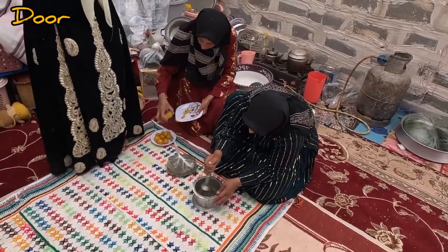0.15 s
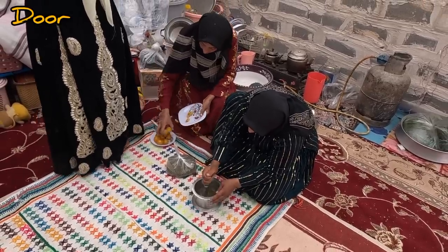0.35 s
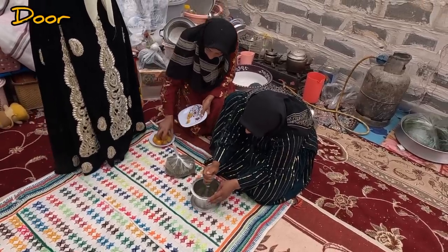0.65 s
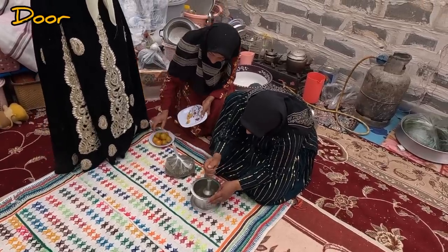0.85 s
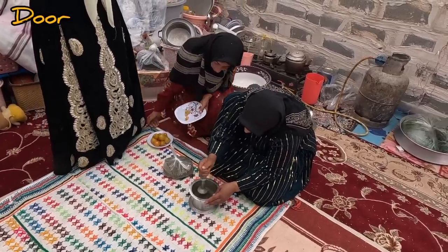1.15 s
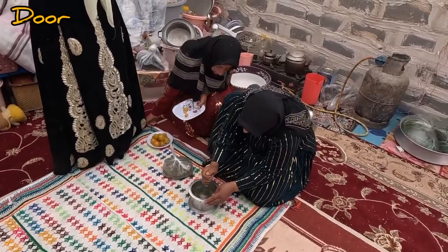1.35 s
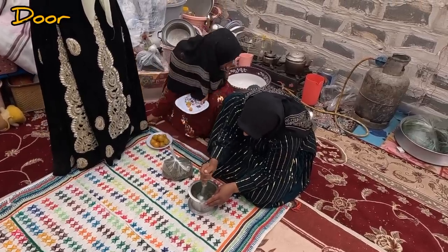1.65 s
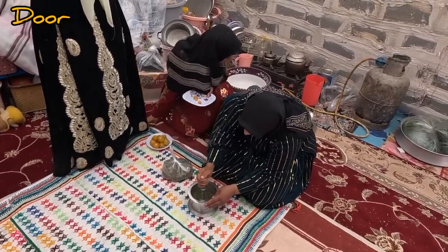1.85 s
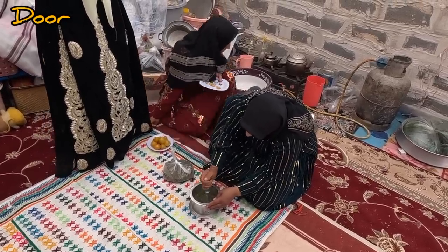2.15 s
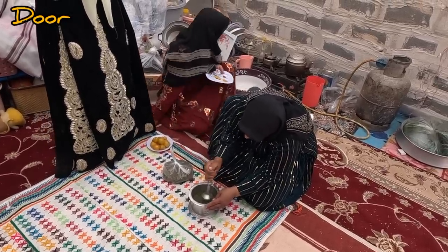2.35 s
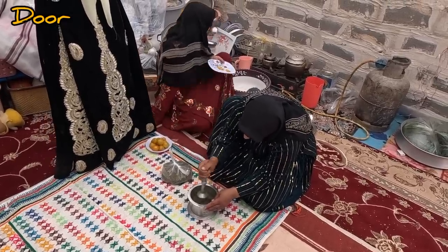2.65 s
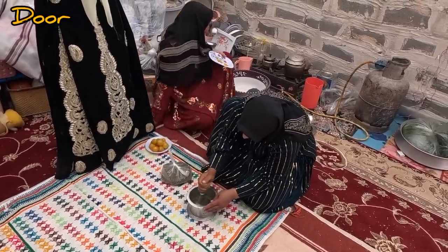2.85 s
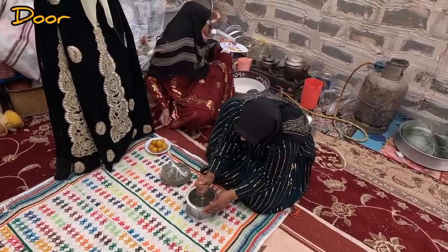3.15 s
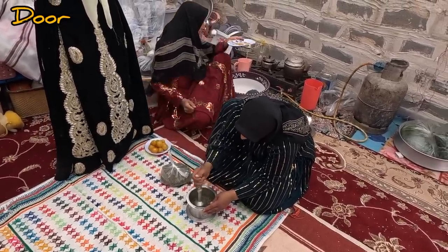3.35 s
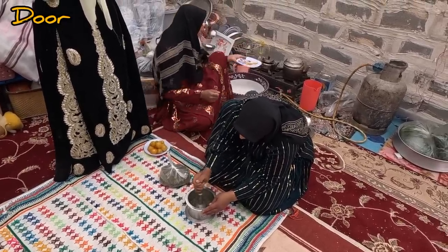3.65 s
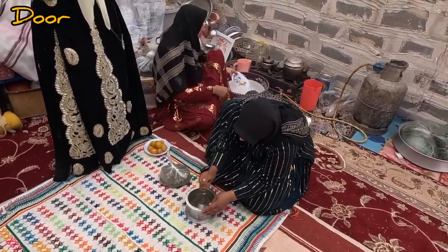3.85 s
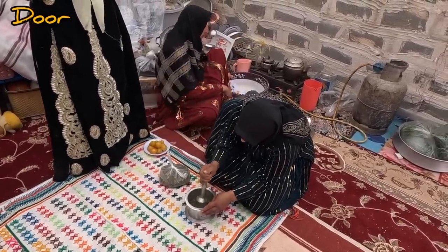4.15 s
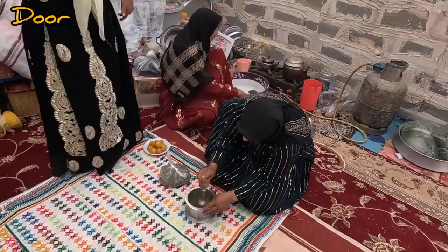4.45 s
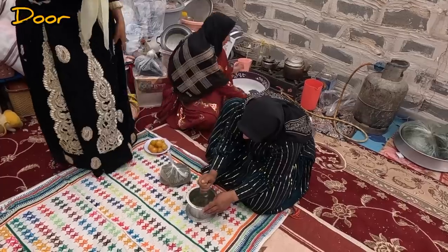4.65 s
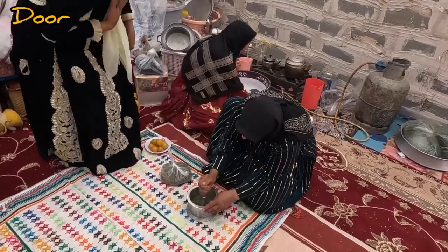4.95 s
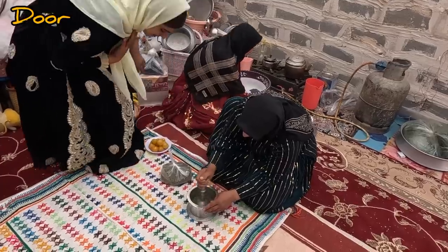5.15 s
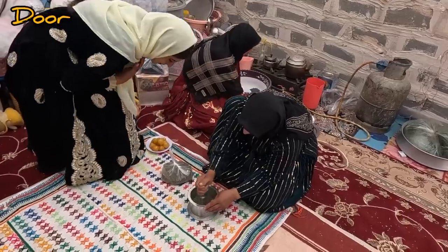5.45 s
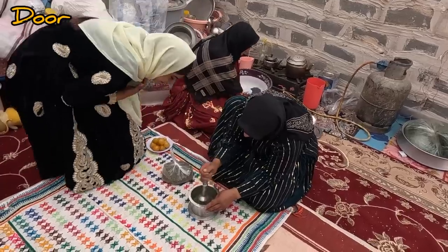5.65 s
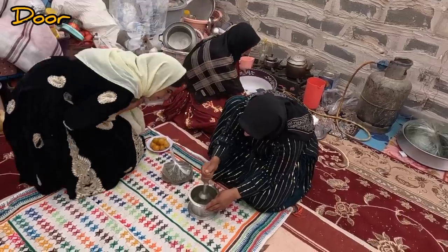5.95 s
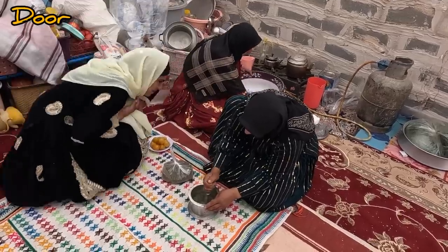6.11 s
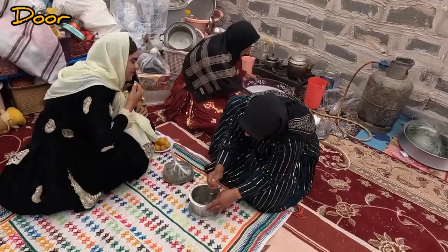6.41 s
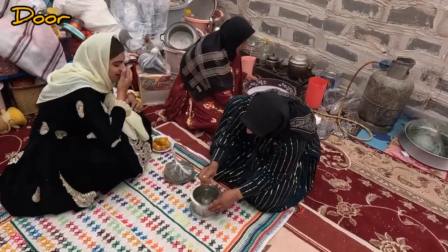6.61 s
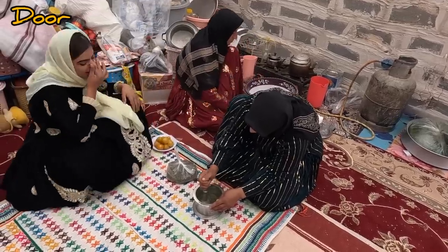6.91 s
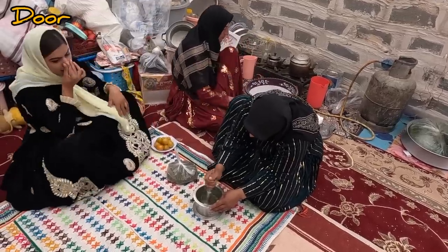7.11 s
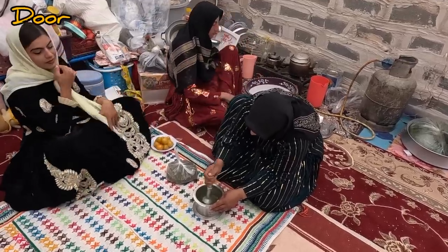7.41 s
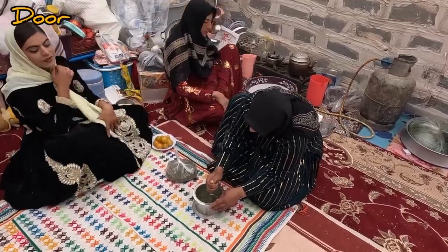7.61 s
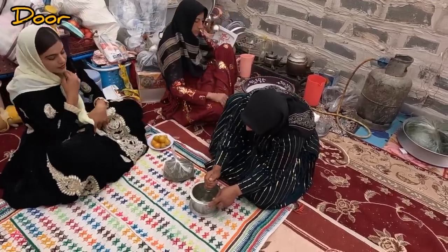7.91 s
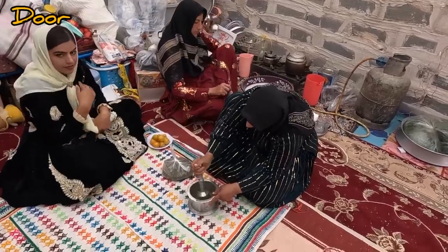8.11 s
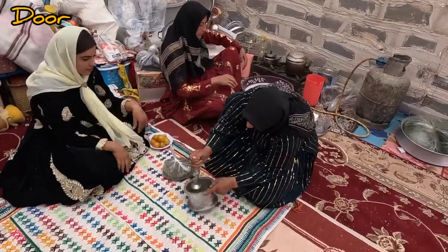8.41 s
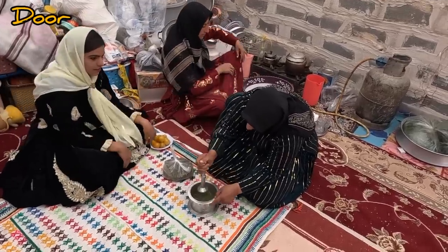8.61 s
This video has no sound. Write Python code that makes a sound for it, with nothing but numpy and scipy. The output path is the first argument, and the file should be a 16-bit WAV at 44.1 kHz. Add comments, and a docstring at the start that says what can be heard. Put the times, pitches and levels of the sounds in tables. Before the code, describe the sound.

Steady dull knocks of a pestle crushing dried herbs in a small metal mortar, with soft rustling, a cup clink and a dish set down.

```python
"""From the start a metal pestle pounds herbs in a metal mortar, held by hand on a carpeted floor: each
blow is a puff of crunching noise, then ringing tones of floor, mortar and pestle. Shaped noise makes
rustling clothes, room tone and rumbling air throughout; puffs of noise make small ticks, clicks and short
swishes. Near 2.8 s a touched cup rings; from 4.2 s a dish is set down, rattles (random contacts) and drags.
After the last blow, near 8 s, a soft bump comes and the pestle sings faintly as it slides on the wall."""
import sys
import numpy as np
from scipy import signal
from scipy.fft import rfft, irfft, next_fast_len
from scipy.io import wavfile
from scipy.ndimage import uniform_filter1d

SR = 44100
rng = np.random.default_rng(int(sys.argv[2]) if len(sys.argv) > 2 else 0)


def dump_mix(stems):
    """Bounce the given channels to the path in sys.argv[1] as a 16-bit WAV at rate SR."""
    frames = np.atleast_2d(stems).T  # one column per channel
    limited = np.clip(frames, -1, 1)  # hard clip at full scale
    pcm = np.round(limited * 32767).astype(np.int16)
    wavfile.write(sys.argv[1], SR, pcm)


N = 386757  # length [samples]


def gain_of(db):
    """Turns dB into a gain."""
    return 10 ** (np.asarray(db) / 20)


def evened(x):
    """Scales a signal to rms 1."""
    return x / np.sqrt(np.mean(x ** 2) + 1e-20)


def read(points, hz):
    """Reads a table between its points, on a log-frequency axis."""
    f, value = np.transpose(points)
    return np.interp(np.log(hz + 1), np.log(f + 1), value)


def add(mix, s, sound):
    """Adds a sound at time s, which may lie just before the start."""
    at = round(s * SR)
    sound = sound[..., max(-at, 0):]
    part = mix[..., max(at, 0):][..., :sound.shape[-1]]
    part += sound[..., :part.shape[-1]]


def panned(db, pan_db):
    """Gives the gains of left and right, pan_db apart."""
    return gain_of(db + np.array([[.5], [-.5]]) * pan_db)


def coloured(x, points):
    """Filters x by a table of levels over frequency, then scales it to rms 1."""
    hz = np.fft.rfftfreq(x.shape[-1], 1 / SR)
    spectrum = rfft(x) * gain_of(read(points, hz))
    return evened(irfft(spectrum, x.shape[-1]))


SHARE_DB = 2.5  # how unevenly a strike shares itself among the tones [dB]


def ring(modes, force, choke_s, rise_s=1e-5):
    """A force sets an object's tones ringing; after choke_s they die quickly. Peak 1."""
    t = np.arange(SR // 4) / SR
    share_db = SHARE_DB * rng.standard_normal(len(modes))
    tone = 0
    for (hz, db, t60), extra_db in zip(modes, share_db):
        tone = tone + gain_of(db + extra_db - 60 * t / t60) * np.sin(2 * np.pi * hz * t)
    rise = 1 - np.exp(-t / rise_s)
    choke = 1 / (1 + (t / choke_s) ** 6)
    out = signal.oaconvolve(tone * rise * choke, force)[:len(t)]
    return out / abs(out).max()


def burst(points, rise_s, t60, grit):
    """A gritty puff of noise rises quickly and dies; more grit [dB] makes its grains less even."""
    t = np.arange(SR // 4) / SR
    grains = rng.standard_normal(len(t)) * gain_of(grit * rng.standard_normal(len(t)))
    rise = 1 - np.exp(-t / rise_s)
    return coloured(grains, points) * rise * gain_of(-60 * t / t60)


def diffuse(layers, size, same, patchy_db, flicker_db):
    """Patchy, flickering noise from (spectrum, times, levels) layers, alike in both ears by `same`."""
    hop = size // 4
    frames, hz = N // hop + 5, np.fft.rfftfreq(size, 1 / SR)
    t = np.arange(frames) * hop / SR
    a, b, c, d, patches = rng.standard_normal((frames, len(hz), 5)).T
    patches = uniform_filter1d(patches, size=6, axis=0)  # smooth over frequency, then time
    patches = evened(uniform_filter1d(patches, size=16, axis=1))
    flicker = evened(uniform_filter1d(rng.standard_normal(frames), size=3))
    power = 0
    for points, s, db in layers:
        shape = gain_of(read(points, hz))
        shape = shape[:, None] / np.linalg.norm(shape)
        power = power + (shape * gain_of(np.interp(t, s, db))) ** 2
    same = np.clip(read(same, hz), -1, 1)[:, None]
    left = a + 1j * b
    right = same * left + np.sqrt(1 - same ** 2) * (c + 1j * d)
    z = np.array([left, right])
    z *= np.sqrt(power) * gain_of(patchy_db * patches + flicker_db * flicker)
    return signal.istft(z, nperseg=size, noverlap=size - hop)[1][:, :N]


def swells(rows, under_db):
    """Bell-shaped swells of level over a steady level under_db; gives times and dB."""
    t = np.arange(0, N / SR, .005)
    power = gain_of(2 * under_db)
    for s, db, length_s in rows:
        power = power + gain_of(2 * db) * np.exp(-((t - s) / length_s) ** 2 * 2)
    return t, 10 * np.log10(power)


# rumble of moving air, before the left-right offset: (time [s], level [dB])
AIR_RUMBLE = [(0.0, -50), (1.0, -49), (1.9, -55), (2.45, -50), (2.9, -57), (3.37, -50), (3.95, -58),
              (4.27, -52), (4.6, -41), (4.85, -45), (5.05, -43), (5.2, -50), (5.8, -49), (6.02, -39),
              (6.3, -48), (6.8, -43), (7.0, -49), (7.67, -41), (7.95, -47), (8.25, -55), (8.77, -52)]
# fluttering gusts, before that offset: (middle time [s], level [dB], length [s])
GUSTS = [(1.54, -63, .05), (4.42, -57, .07), (4.62, -43, .06), (4.75, -48, .07), (5.0, -53, .07),
         (6.06, -51, .06), (7.77, -55, .06)]
# how alike the rumble is in both ears: (frequency [Hz], likeness [0 to 1])
AIR_LIKENESS = [(25, .88), (100, .97)]
CALM_FLUTTER_DB, AIR_FLICKER_DB = -80, 3  # flutter between gusts, unsteadiness [dB]


def air():
    """Moving air makes lumpy low pressure swings, partly different at each microphone port."""
    s, deep_db = np.transpose(AIR_RUMBLE)
    # spectra: (frequency [Hz], relative level [dB])
    deep = [(5, 2), (22, 26.5), (50, -19.5), (70, -31), (110, -55.5)]
    flutter = [(40, -17.5), (65, 9), (110, 3.5), (170, -4), (300, -87)]
    layers = [(deep, s, deep_db), (flutter, *swells(GUSTS, CALM_FLUTTER_DB))]
    rumble = diffuse(layers, size=2048, same=AIR_LIKENESS, patchy_db=2, flicker_db=AIR_FLICKER_DB)
    return gain_of([[-1.5], [1.5]]) * rumble  # stronger on the right


# how alike room tone and rustle are in both ears: (frequency [Hz], likeness [0 to 1])
LIKENESS = [(60, 0.49), (160, 0.433), (450, 0.55), (1240, 0.69), (3400, 0.78), (9330, 0.75)]
# colour of the quiet room: (frequency [Hz], relative level [dB])
ROOM_TONE = [(59, -43), (100, -14.5), (168, 1.5), (510, -5), (809, -15.5), (1040, -5), (1360, -7.5),
             (4130, -23), (5400, -15.5), (7480, -13.5), (9780, -27), (12700, -45), (21500, -120)]
ROOM_TONE_DB = -68


def room_tone():
    """The quiet room is a steady, faint noise."""
    layers = [(ROOM_TONE, [0], [ROOM_TONE_DB])]
    return diffuse(layers, size=1024, same=LIKENESS, patchy_db=1, flicker_db=1.5)


# clothes and hands: (time [s], dull rustle level [dB], fine rustle level [dB])
RUSTLE = [(0.0, -59, -63.5), (0.2, -69.5, -74), (0.6, -62, -71), (0.95, -63.5, -72), (1.25, -76, -69),
          (1.42, -80, -78), (1.63, -70, -86), (1.9, -80, -86), (2.25, -69, -74), (2.65, -61, -62),
          (2.8, -63, -67), (3.1, -84, -82), (3.45, -88, -80), (3.75, -74, -78), (4.05, -95, -95),
          (4.3, -70, -70), (4.7, -90, -72), (4.88, -85, -90), (5.0, -71, -80), (5.42, -67.5, -70.5),
          (5.94, -74.5, -78), (6.28, -66, -67), (6.45, -80, -90), (6.65, -70, -75), (6.86, -66.5, -65.5),
          (7.11, -75.5, -77.5), (7.5, -66, -67), (7.8, -74, -76), (8.35, -83.5, -80.5), (8.77, -68, -74)]
# the dish drags on the shelf between its knocks: (middle time [s], level [dB], length [s])
DRAGS = [(4.375, -57, .03), (4.49, -51, .04)]
# colour of the dull rustle: (frequency [Hz], relative level [dB])
DULL = [(410, -49.5), (700, -9), (757, -6), (831, -17.5), (1200, 0.5), (2100, -5), (2270, -5.5),
        (4500, -12), (5850, -35.5), (9900, -120)]
# colour of the fine rustle: (frequency [Hz], relative level [dB])
FINE = [(1470, -34.5), (2500, -10.5), (4150, -12), (5530, -5), (6520, -11.5), (7440, -6.5), (8530, -13),
        (9780, -23), (12700, -48.5), (21500, -120)]
DRAG_FINE_DB = -9  # fine hiss of a drag, relative to its dull part
CLOTH_PATCHY_DB, CLOTH_FLICKER_DB = 1.5, 1.5


def rustle():
    """Rubbing makes noise: cloth slides on cloth and carpet, and the dish drags."""
    s, dull_db, fine_db = np.transpose(RUSTLE)
    t, drag_db = swells(DRAGS, under_db=-120)
    layers = [(DULL, s, dull_db), (FINE, s, fine_db), (DULL, t, drag_db), (FINE, t, drag_db + DRAG_FINE_DB)]
    return diffuse(layers, size=512, same=LIKENESS, patchy_db=CLOTH_PATCHY_DB, flicker_db=CLOTH_FLICKER_DB)


# small ticks, clicks and short swishes: (time [s], level [dB], pitch [Hz], skirt level [dB],
# time to fade by 60 dB [s], left minus right [dB])
SMALL_SOUNDS = [(0.5427, -50, 1290, -6, 0.074, 0.5), (0.8688, -51, 2046, -10, 0.09, -0.5),
                (0.9289, -50.5, 1560, -8, 0.044, -0.5), (2.395, -62, 7000, -3, 0.08, 0),
                (3.3652, -55.5, 1070, -13, 0.2, 0), (3.3876, -57, 1200, 1, 0.069, -1),
                (4.9283, -57.5, 1690, -16, 0.056, 0.5), (6.8456, -42, 3000, 5, 0.027, 1.5),
                (7.3773, -56, 4500, 2, 0.14, 2), (7.5656, -49.5, 2860, -18, 0.08, 4),
                (8.0688, -54.5, 4300, -1, 0.08, -3.5), (8.1152, -61, 6500, -4, 0.06, -5.5),
                (8.4269, -55.5, 5670, 7, 0.11, 3.5), (8.4354, -55.5, 1390, -9.0, 0.071, 1),
                (8.5984, -61, 1380, -4, 0.068, 2)]
# soft low bumps on the carpet, columns as for the small sounds
BUMPS = [(8.069, -43, 187, -23, 0.11, 0.036), (8.574, -58, 176, -15, 0.4, 0.)]


def small_sounds():
    """Ticks, clicks, swishes and bumps are noise puffs round one pitch, each with its own left-right balance."""
    out = np.zeros((2, N))
    flank = 1.2  # frequency ratio from the pitch to the start of its broad skirt
    for s, db, hz, skirt_db, t60, pan_db in SMALL_SOUNDS + BUMPS:
        shape = [(0.44 * hz, skirt_db - 12.5),
                 (hz / flank, skirt_db), (hz, 0), (hz * flank, skirt_db),
                 (min(2.4 * hz, 9000), skirt_db - 7),
                 (min(3.6 * hz, 11000), skirt_db - 24),
                 (13000, skirt_db - 38)]
        add(out, s, panned(db, pan_db) * burst(shape, rise_s=0.83 / hz, t60=t60, grit=9.4))
    return out


# a cup is touched: (time [s], peak level of its ring [dB], left minus right [dB])
CLINK = (2.8222, -27.5, 4.7)
# tones of the cup: (frequency [Hz], relative level [dB], time to fade by 60 dB if not damped [s])
CUP = [(1660, -27, .04), (2390, -6, 0.06), (2407, -5, .09), (2460, 3, 0.094), (2596, 3, .04),
       (3100, -29, 0.037)]
# bright slap of cup and dish: (frequency [Hz], relative level [dB])
SLAP = [(880, -15), (1500, -4.5), (1770, -16), (2100, -13.5), (3470, -13), (3910, -17.5), (7550, -20.5),
        (9780, -35), (12700, -60), (21500, -120)]
CUP_CHOKE_S = .035  # the touched cup is soon damped


def clink():
    """A touch rings the cup once, short and bright, stronger on the left, with a crisp front."""
    s, db, pan_db = CLINK
    out = np.zeros((2, N))
    sound = ring(CUP, rng.standard_normal(12), CUP_CHOKE_S)
    sound = sound + 0.04 * burst(SLAP, rise_s=.0004, t60=0.23, grit=2.7)
    add(out, s, panned(db, pan_db) * sound)
    return out


# the dish meets the shelf: (time [s], body level [dB], bright slap level [dB],
# rattle length [s], shortened by RATTLE_SCALE)
DISH_KNOCKS = [(4.203, -27.5, -30.5, 0.011), (4.352, -35, -70, 0.0084), (4.423, -48, -48, 0.014),
               (4.47, -36.5, -48, 0.0093), (4.5, -25, -30, 0.0068), (4.551, -31, -39, 0.0049)]
# tones of the dish: (frequency [Hz], relative level [dB], time to fade by 60 dB if not damped [s])
DISH = [(183, -3.5, 0.09), (237, -5.5, 0.08), (373, 15.5, 0.035), (744, 1.5, 0.044), (996, 16, 0.031),
        (1183, -10, 0.058), (1390, -7, 0.017), (1650, -23.5, 0.044), (2130, -29.5, 0.035),
        (2790, -6.5, 0.042), (3150, -13.5, 0.055), (3530, -14, 0.082), (4460, -19.5, 0.042),
        (4700, -3.5, .06)]
RATTLE_SCALE = 0.76


def dish():
    """Each knock is a short rattle of random contacts that rings the dish, with a bright slap."""
    out, t = np.zeros(N), np.arange(3000) / SR
    for s, body_db, slap_db, rattle_s in DISH_KNOCKS:
        contacts = rng.standard_normal(len(t)) * (rng.random(len(t)) < .03)
        rattle = contacts * t * np.exp(-t / (RATTLE_SCALE * rattle_s))
        add(out, s, gain_of(body_db) * ring(DISH, rattle, choke_s=0.074))
        add(out, s, gain_of(slap_db) * burst(SLAP, rise_s=0.00065, t60=0.083, grit=1.7))
    return out


# the pestle slides on the wall and sings faintly: (time [s], level [dB], length [s])
SLIDES = [(8.299, -60.5, 0.06), (8.389, -63.5, 0.076)]
# tones of the pestle: (frequency [Hz], relative level [dB], time to fade by 60 dB if not damped [s])
PESTLE = [(6250, -11.5, 0.28), (6342, 4, 0.058), (7394, -7.5, 0.16), (7600, 0.5, 0.057),
          (8570, -35.5, 0.18)]


def slides():
    """Rubbing is a swathe of noise force that keeps the pestle's tones going."""
    out, t = np.zeros(N), np.arange(SR // 4) / SR
    for s, db, length_s in SLIDES:
        rub = rng.standard_normal(len(t)) * np.exp(-(t / length_s) ** 4)
        add(out, s, gain_of(db) * ring(PESTLE, rub, choke_s=.06))
    return out


# pestle blows: (time [s], thud peak [dB], cushion of herbs under the pestle [dB],
# metal clack [dB], wall ring [dB], pestle ring [dB])
BLOWS = [(0.0, -23.5, 18.5, -40, -76, -58), (.362, -19.5, 18.5, -40.5, -67, -45),
         (.696, -18.5, 11, -36.5, -78, -41), (1.053, -29.5, 15.5, -47.5, -69, -46),
         (1.412, -22.5, 33.5, -53, -69, -50), (1.786, -17, 11.5, -44, -65, -48),
         (2.136, -19.5, 14, -42, -62, -37.5), (2.5, -22.5, 19.5, -50, -66, -54),
         (2.866, -23, 28, -42, -73, -68.5), (3.226, -21, 12, -50, -66, -48),
         (3.598, -19.5, 21, -40.5, -82, -41.5), (3.963, -20, 18.5, -48.5, -84, -47),
         (4.338, -15.5, 10.5, -36, -65, -58), (4.698, -24, 22, -60, -69, -52),
         (5.063, -16.5, 12.5, -41, -78, -43.5), (5.426, -15.5, 9, -39.5, -63, -57),
         (5.802, -18.5, 26, -43.5, -72, -45.5), (6.174, -13, 3, -27, -48.5, -39),
         (6.526, -21, 14, -48, -57, -52), (6.899, -20, 28, -49, -70, -46),
         (7.268, -18, 12.5, -36.5, -65, -47.5), (7.639, -15.5, 7.5, -35, -48.5, -50.5),
         (7.965, -23, 22.5, -46, -78, -44.5)]
# crunch of the herbs: (frequency [Hz], relative level [dB])
CRUNCH = [(530, -5), (900, -11.5), (2140, -9), (2490, -15.5), (3460, -18.5), (4490, -13), (5760, -16),
          (6300, -14), (8940, -17.5), (9780, -28), (12700, -31), (21500, -120)]
# Tones of the next five: (frequency [Hz], relative level [dB], time to fade by 60 dB if not damped [s])
# deepest boom
BOOM = [(41, -6, 0.16), (68.3, -5.5, 0.42), (104.8, -20, 0.45), (130.5, -0.5, 0.25), (161.7, 6, 0.13)]
# thud of the floor
FLOOR = [(197.5, -0.5, 0.08), (226.4, 2.5, 0.14), (281.8, -4.5, 0.12), (313.4, -9, 0.11)]
# hollow knock
HOLLOW = [(485.7, -2, .12), (525, -1, 0.091), (548.7, 0, 0.09), (586.3, -4, 0.096), (655, -7.5, .1),
          (723, -12.5, 0.082), (809, -19, .1)]
# metal clack
CLACK = [(1350, -5, .02), (1800, -3, .02), (2150, -3, .02), (2500, 0, .025), (2650, -3, .045),
         (2950, -5, .02), (4570, -5, .035)]
# wall of the mortar
WALL = [(1173, 0, .45)]
CRUNCH_DB, CRUNCH_SHARE = -32.5, .4  # the crunch follows the thud by this share of its dB
CRUNCH_RISE_S = .006  # the pestle ploughs through herbs before it lands
HOLLOW_RISE_S = .0018  # the hollow knock swells
# the cushion takes its dB off the hollow knock and lengthens the contact
BARE_CONTACT_S, CONTACT_S_PER_DB = .0031, .00011


def pounding():
    """The herbs crunch first; then metal lands, the floor gives and mortar and pestle ring."""
    out = np.zeros(N)
    for s, thud_db, cushion_db, clack_db, wall_db, pestle_db in BLOWS:
        hollow_db = thud_db - cushion_db
        crunch_db = CRUNCH_DB + CRUNCH_SHARE * thud_db
        contact_s = np.clip(BARE_CONTACT_S + CONTACT_S_PER_DB * cushion_db, .003, .008)
        # the base is driven down and springs back within the contact, leaving a net push of air
        u = np.linspace(0, 1, round(contact_s * SR))
        push = np.sin(np.pi * u)
        swing = -push * np.sin(2 * np.pi * u)
        knock, tap = signal.windows.hann(40), signal.windows.hann(8)

        crunch = burst(CRUNCH, CRUNCH_RISE_S, t60=0.065, grit=2)
        add(out, s - .0035, gain_of(crunch_db) * crunch)
        add(out, s + 0.0026, 0.23 * gain_of(thud_db) * ring(BOOM, push, choke_s=0.099))
        add(out, s + 0.00092, gain_of(thud_db) * ring(FLOOR, swing, choke_s=0.026, rise_s=0.0009))
        hollow = ring(HOLLOW, knock, choke_s=.04, rise_s=HOLLOW_RISE_S)
        add(out, s + 0.00067, -gain_of(hollow_db) * hollow)
        add(out, s - .001, gain_of(clack_db) * ring(CLACK, rng.standard_normal(150), choke_s=.1))
        add(out, s, gain_of(wall_db) * ring(WALL, tap, choke_s=.13))
        add(out, s, gain_of(pestle_db) * ring(PESTLE, rng.standard_normal(60), choke_s=.045))
    return out


# how fast the soft room falls silent: (frequency [Hz], time to fade by 60 dB [s])
ROOM_FADE = [(100, 0.23), (300, 0.077), (1000, 0.21), (4000, 0.2), (10000, 0.068)]


def room(x):
    """Echoes are sparse taps of random sign, each band dying at its own speed, partly shared by the ears."""
    taps = np.zeros((2, SR // 2))
    at = np.arange(200, SR // 2 - 20, 20)
    at = at + rng.integers(0, 20, (2, len(at)))
    np.put_along_axis(taps, at, rng.choice([-1., 1.], at.shape), 1)
    taps[1] += 1.9 * taps[0]  # close ports share much of the tail
    hz, t, z = signal.stft(taps, SR, nperseg=256)
    fade = gain_of(-60 * t / read(ROOM_FADE, hz)[:, None])
    tail = signal.istft(z * fade, SR, nperseg=256)[1]
    tail = tail / np.linalg.norm(tail, axis=1, keepdims=True)
    return signal.oaconvolve(x, tail, axes=1)[:, :N]


# phase shift between the ports: (frequency [Hz], lead of the left [radians])
LEAD = [(60, -0.16), (250, -.12), (690, -0.68), (2760, -0.7), (5000, -.65), (9470, 0.21)]
# level difference between the ports: (frequency [Hz], left minus right [dB])
TILT = [(60, -2.5), (120, -0.5), (250, -0.5), (520, 0.0), (1070, 0.0), (2210, 1.0), (4540, 0.0),
        (9330, 1.5)]


def ports(x):
    """Two close microphone ports hear the sound with a small shift of phase and level."""
    size = next_fast_len(N + SR)
    hz = np.fft.rfftfreq(size, 1 / SR)
    half = gain_of(.5 * read(TILT, hz)) * np.exp(.5j * read(LEAD, hz))  # half the shift goes to each side
    return irfft(rfft(x, size) * np.array([half, 1 / half]), size)[:, :N]


def scene():
    """Near sounds with their room, over rustle, room tone and air."""
    near = pounding() + slides() + dish() + small_sounds() + clink()
    heard = near + gain_of(-14) * room(near) + rustle() + room_tone()
    return ports(heard) + air()


EDGE_HZ = 15700  # the treble ends here


def record(dry):
    """A smooth low-pass filter limits the treble."""
    low_pass = signal.firwin(511, EDGE_HZ, window=("kaiser", 9), fs=SR)
    return signal.oaconvolve(dry, low_pass[None], "same")


dry = scene()
out = record(dry)
dump_mix(out)
```